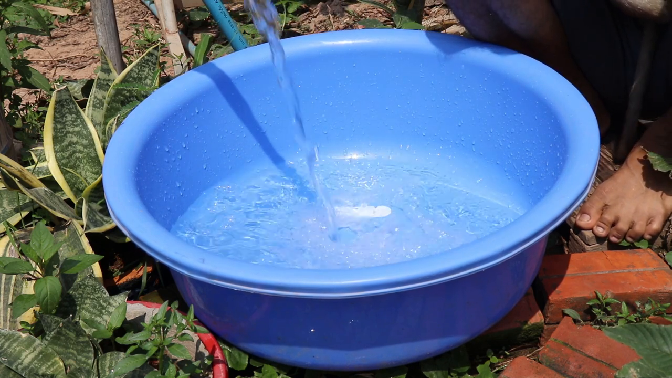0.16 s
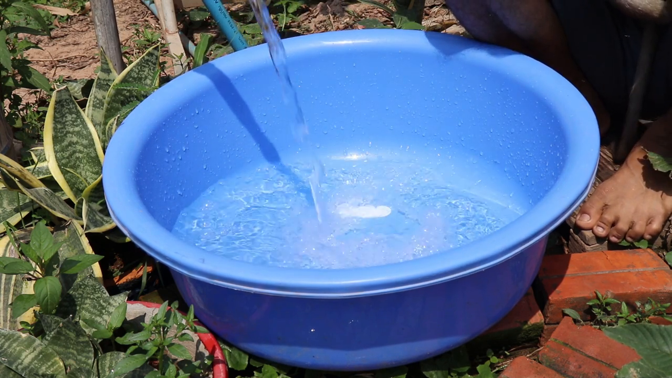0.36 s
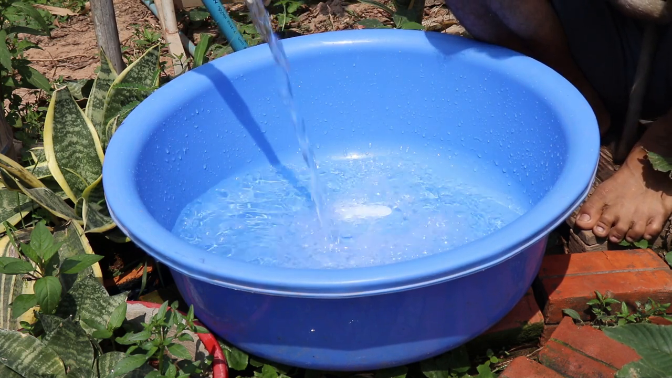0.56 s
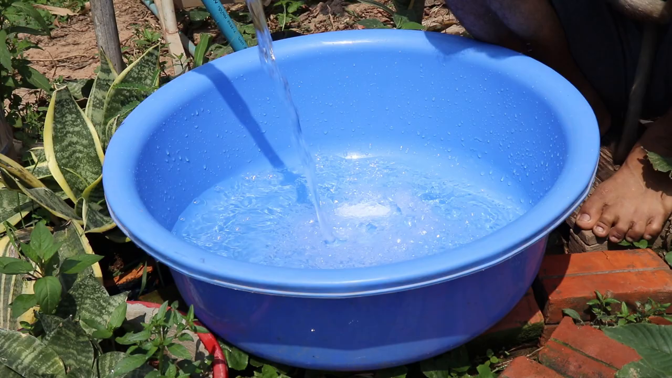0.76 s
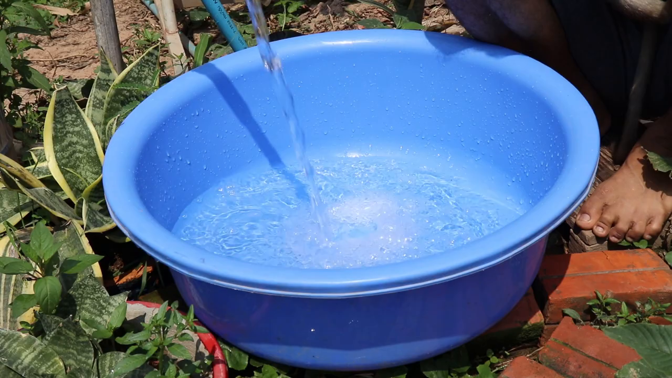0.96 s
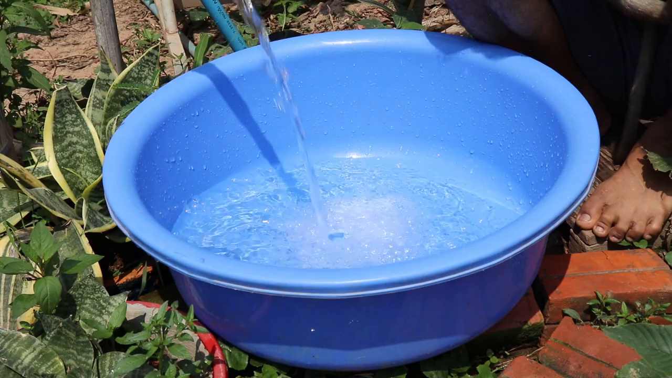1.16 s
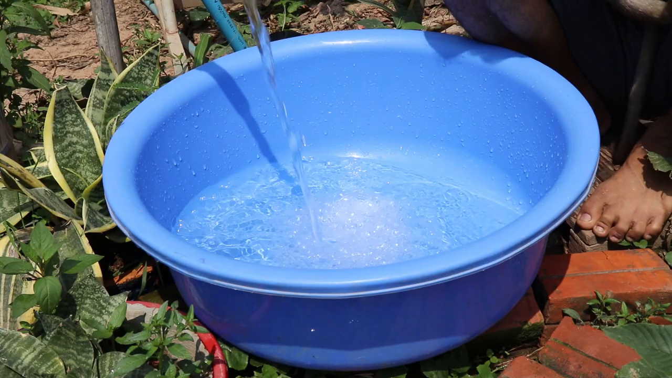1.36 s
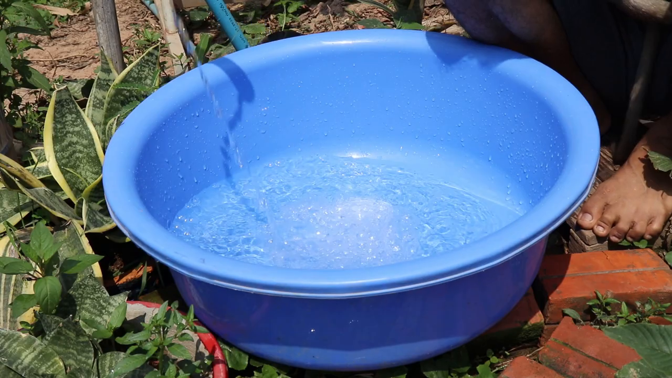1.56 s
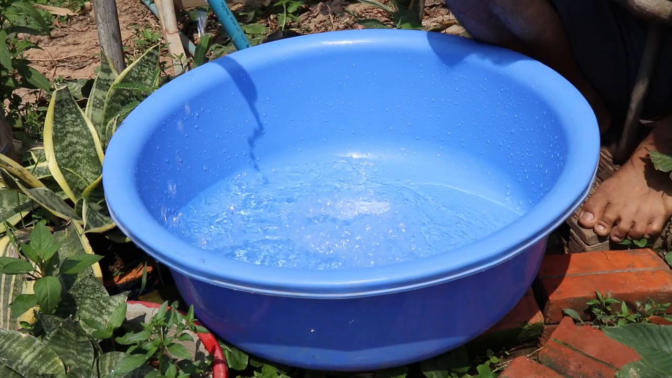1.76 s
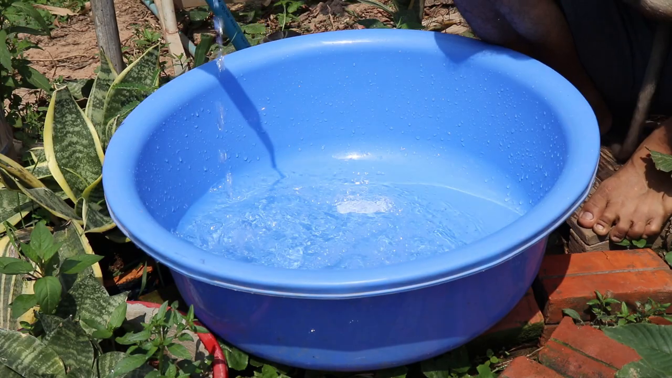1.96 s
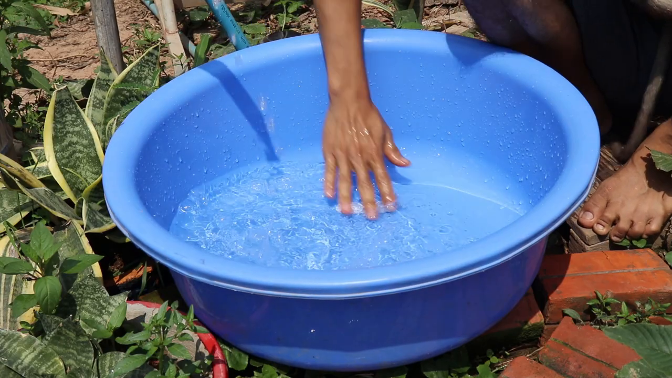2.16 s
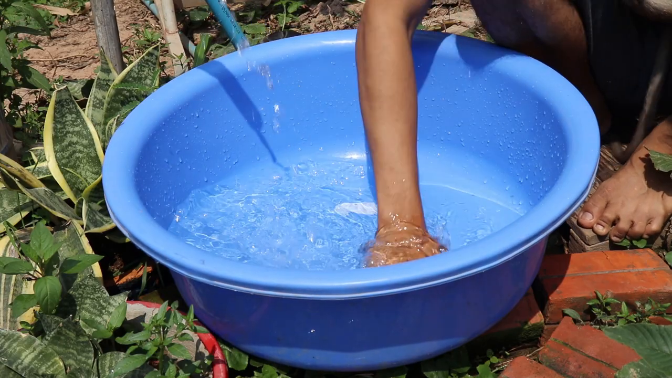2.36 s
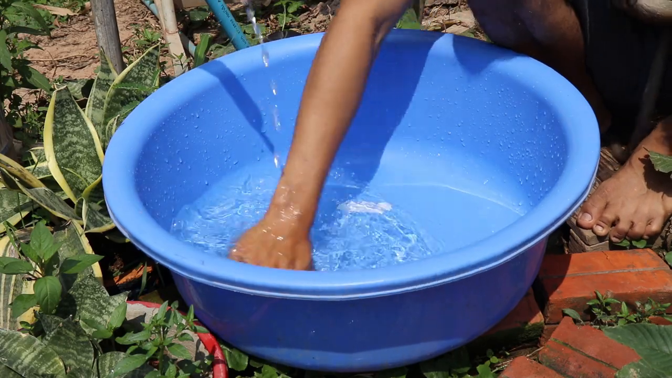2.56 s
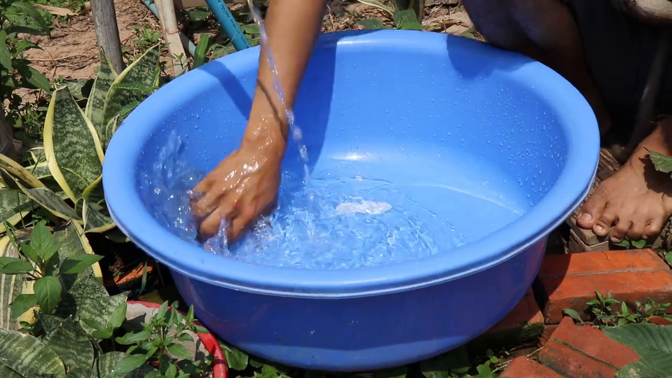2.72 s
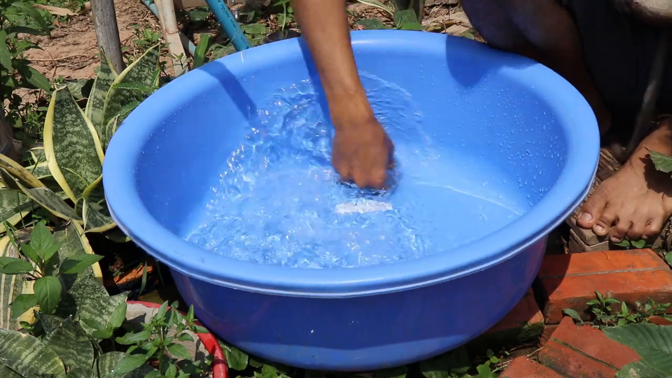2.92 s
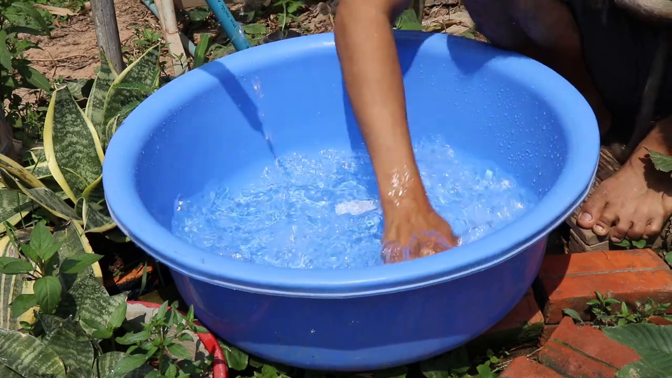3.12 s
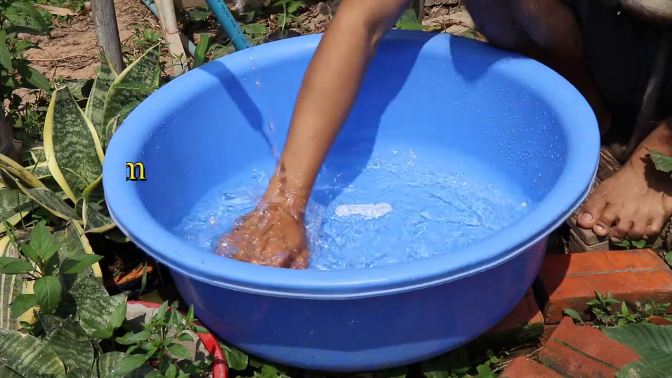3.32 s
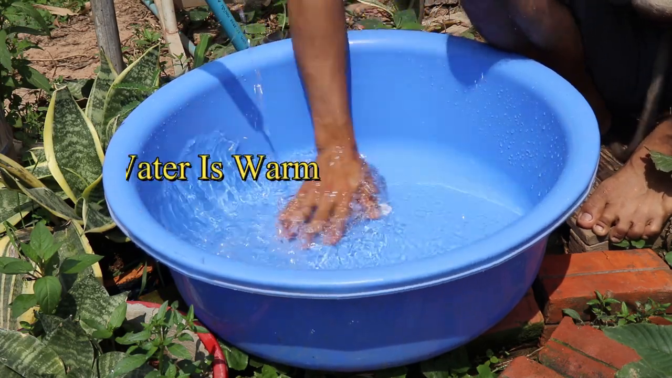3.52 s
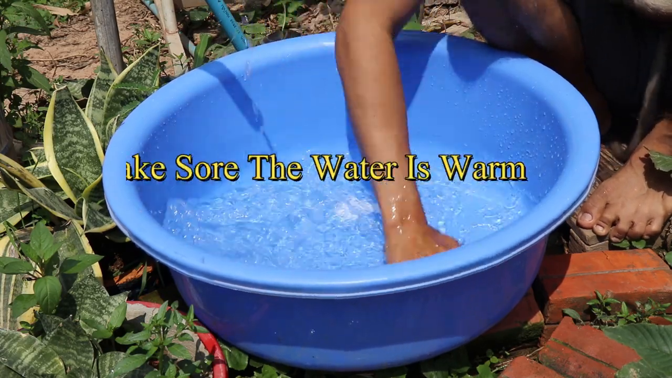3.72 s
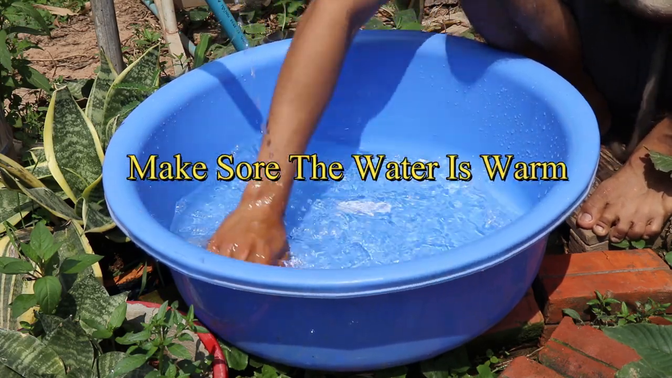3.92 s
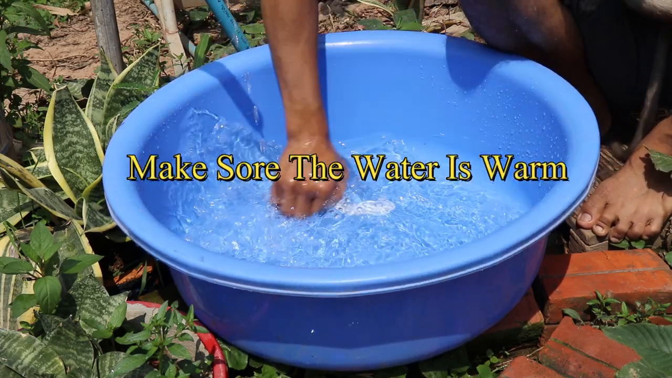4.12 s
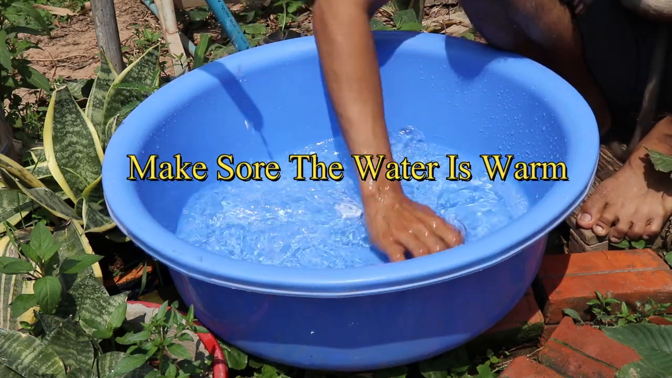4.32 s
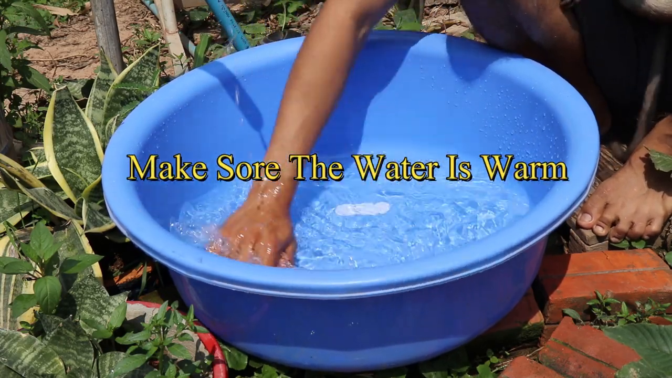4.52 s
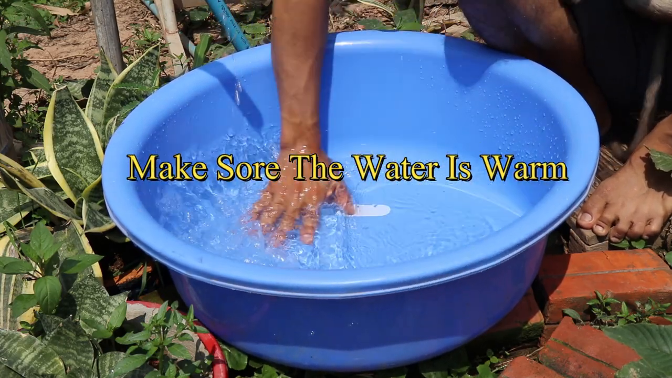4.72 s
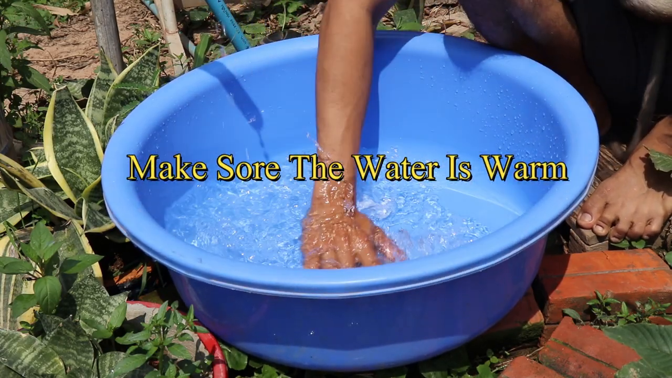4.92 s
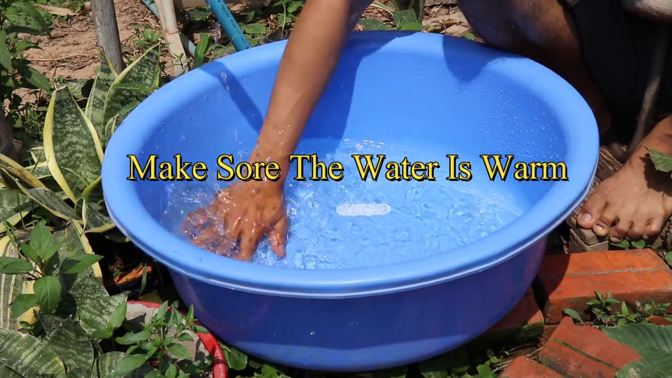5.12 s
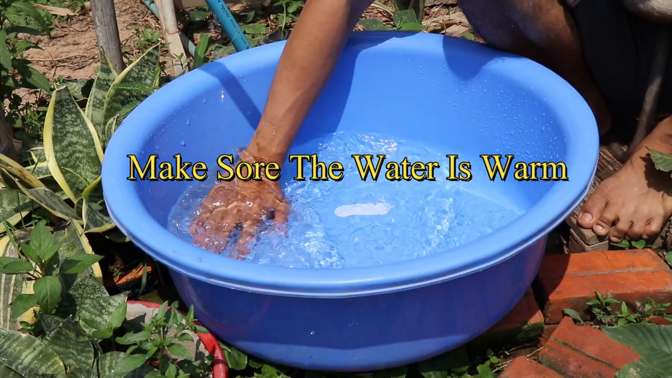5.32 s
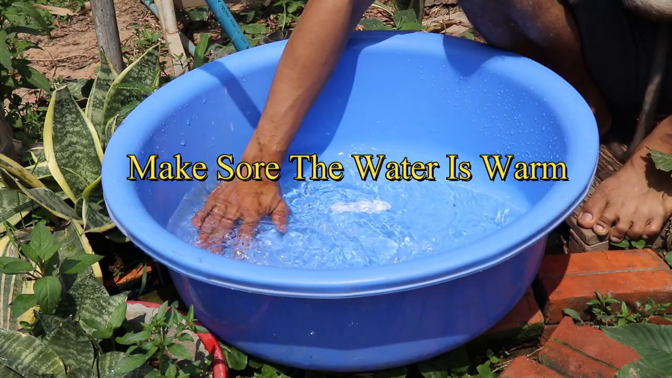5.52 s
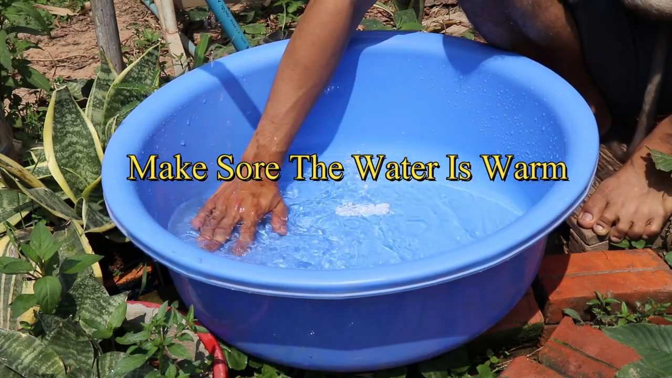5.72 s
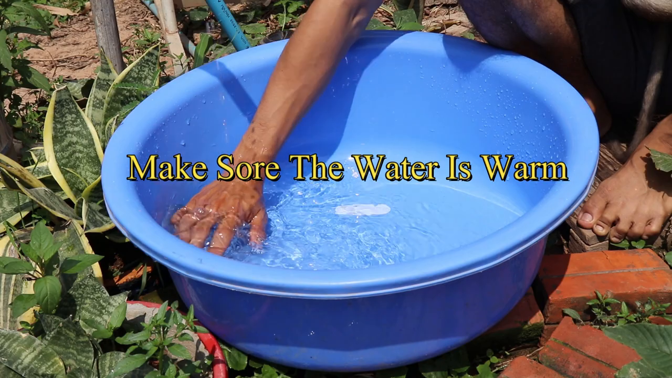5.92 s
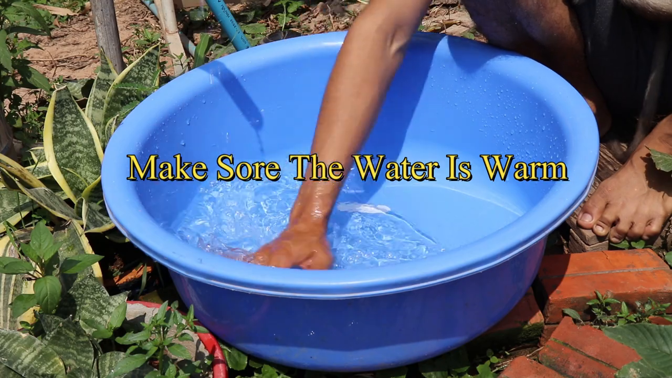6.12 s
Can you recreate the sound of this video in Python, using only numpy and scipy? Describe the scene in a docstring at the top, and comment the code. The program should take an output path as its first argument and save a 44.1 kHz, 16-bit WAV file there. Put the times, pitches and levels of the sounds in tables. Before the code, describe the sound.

Close outdoor sound of water falling hard into a half-full plastic basin, dense and bubbly with hollow gurgles and bright hissing spray. After under two seconds it breaks up into sparse drips and plinks. Then a hand swishes the water to and fro in lively, uneven splashes, which settle to faint trickling before one last small stir. Dry, close, single-channel, with very faint open air.

```python
"""Outdoors, a half-full plastic basin: water falls in from above, thins to drops, and a hand swishes it to and fro.
The body of the sound is trapped air: swarms of decaying sine bubbles whose pitch climbs as they ring.
Filtered noise bursts give the slaps and ticks of falling drops, and tiny clicks the patter of spray.
Wall echoes and hollow resonances colour the water, over faint shaped-noise air and a wavering low hum."""
import sys
import numpy as np
from scipy import signal
from scipy.fft import rfft, irfft, next_fast_len
from scipy.io import wavfile
from scipy.ndimage import uniform_filter1d

SR = 44100
rng = np.random.default_rng(int(sys.argv[2]) if len(sys.argv) > 2 else 0)


def int16_out(signal):
    """Quantize to a 16-bit WAV file."""
    q = np.round(np.clip(np.atleast_2d(signal).T, -1, 1) * 32767)
    wavfile.write(sys.argv[1], SR, q.astype(np.int16))


N = 272097

# Lumps and thin spots in the falling stream: [t/s, swell of the babble level/dB]
GLUGS = [(0.03, 0.5), (0.11, 0.5), (0.2, 2.5), (0.3, -0.5), (0.36, 1), (0.435, 2), (0.595, -1.5), (0.65, 1),
         (0.709, 2.5), (0.78, 2), (1.01, 3), (1.105, 3), (1.18, 2), (1.23, -0.5), (1.285, 2), (1.431, 3),
         (1.635, 2)]
# How hard the water is stirred and how much is thrown: [t/s, bubble level/dB, spray level/dB]
STIR = [(1.8, -45.5, -44), (2.03, -45, -49), (2.25, -41.5, -38), (2.46, -42, -36.5), (2.7, -36.5, -38),
        (2.8, -29, -34), (3.12, -28, -32.5), (3.45, -33.5, -34), (3.6, -28.5, -33.5), (4.15, -29.5, -36.5),
        (4.3, -35, -38), (4.8, -33, -38.5), (4.98, -30.5, -36), (5.15, -31, -36.5), (5.33, -43.5, -46),
        (5.6, -44.5, -47.5), (5.98, -48.5, -48), (6.17, -35.5, -40)]
# The hand or a late lump of water breaks the surface:
# [t/s, hold/s, bubble level/dB, gurgle level/dB, spray level/dB]
SPLASHES = [(1.957, .012, -39, -39, -48), (2.011, 0.017, -39.5, -39, -52), (2.058, .012, -28, -30.5, -33),
            (2.179, 0.0092, -32.5, -34, -36), (2.322, .03, -38, -39, -40), (2.35, .035, -32.5, -32, -42),
            (2.508, 0.019, -39.5, -46, -35), (2.624, 0.032, -39, -59, -48),
            (2.829, 0.099, -25.5, -33.5, -31), (3.078, 0.018, -30.5, -48, -44),
            (3.249, 0.093, -27.5, -35.5, -36), (3.321, 0.049, -35.5, -49, -31.5),
            (3.542, 0.035, -38, -38.5, -45), (3.759, 0.017, -30.5, -40, -35), (3.86, 0.051, -39, -38, -42),
            (4.067, 0.065, -34, -45, -35), (4.283, .025, -47, -36.5, -36), (4.37, .03, -37, -55, -53),
            (4.449, .02, -39, -54, -34), (4.54, 0.054, -44, -45, -34.5), (4.623, 0.038, -26.5, -34, -47),
            (4.765, 0.018, -48, -39, -46), (4.976, 0.07, -36, -48, -33.5), (5.107, 0.033, -35, -45, -50),
            (5.267, .015, -35.5, -52, -52), (5.489, .008, -35, -52, -49), (6.022, .035, -39, -40, -47),
            (6.148, .025, -30.5, -51, -42)]
# Spectrum of the large bubbles that the stream drives down: [f/Hz, relative level per hertz/dB]
DEEP_SPECTRUM = [(90, -23), (150, -13.5), (200, -11), (255, -5), (320, -2.5), (400, -3), (520, -3),
                 (750, -6.5), (1200, -38)]
# Spectrum of the gurgle from stirring and splashes: [f/Hz, relative level per hertz/dB]
GURGLE_SPECTRUM = [(90, -28), (150, -21), (200, -10.5), (260, -8), (320, -2.5), (400, -1.5), (560, 0.5),
                   (750, -4), (1200, -52)]
# Spectrum of the smaller, higher bubbles: [f/Hz, relative level per hertz/dB]
BABBLE_SPECTRUM = [(350, -37), (550, -13.5), (750, -3.5), (1200, -2.5), (2200, -3), (2750, -8), (3500, -12),
                   (6000, -57.5)]
# Spectrum of fine spray, patter and drop ticks: [f/Hz, relative level per hertz/dB]
SPRAY_SPECTRUM = [(1800, -36), (2700, -6), (3200, -1), (3800, -2.5), (5300, -2), (6900, -5), (8000, -1.5),
                  (8900, -0.5), (10000, -8), (11400, -15), (14100, -12.5), (16000, -20)]
# Single bubbles that stand out, low plops to high plinks:
# [t/s, starting pitch f/Hz, relative level/dB, t60/s]
BUBBLES = [(0.088, 4840, -11, .012), (0.344, 1850, 9, 0.0061), (0.482, 1670, 0.5, 0.0078),
           (0.783, 710, -6, 0.034), (0.855, 1680, -2, 0.012), (1.012, 1300, -1, .014),
           (1.415, 1250, 5.5, 0.01), (1.79, 2850, -7.5, 0.0096), (1.96, 1350, -13, 0.018),
           (2.019, 665, -10, 0.012), (2.062, 930, -6.5, 0.025), (2.062, 4380, -3.5, .013),
           (2.075, 3220, -4, .008), (2.094, 1570, -10, 0.021), (2.121, 3020, -0.5, 0.0065),
           (2.16, 2450, -7, 0.018), (2.186, 1000, -5, 0.011), (2.185, 1790, 0, 0.0077),
           (2.23, 2860, -9, .011), (2.242, 4260, -10.5, .014), (2.245, 2200, -14, .02),
           (2.298, 2450, -13, 0.015), (2.327, 5900, -10.5, .01), (2.35, 1510, -10.5, 0.026),
           (2.394, 2820, -11, .012), (2.424, 3680, -19, .017), (2.478, 1690, -19, .022),
           (2.515, 1900, -8.5, .014), (2.536, 4820, -13, .01), (2.55, 2580, -16.5, .022),
           (2.632, 2220, -0.5, 0.0054), (2.633, 4380, -17, .022), (2.661, 1990, -6, 0.016),
           (2.687, 4520, -6.5, 0.0088), (2.704, 1800, -7, 0.011), (2.756, 1350, -5, .011),
           (2.776, 840, -9, 0.013), (2.832, 3050, -5.5, 0.009), (2.87, 850, -0.5, 0.012),
           (2.88, 1090, -3, .021), (2.922, 1960, 0.5, 0.013), (3.079, 1040, -4, 0.028),
           (3.163, 3920, -10.5, 0.041), (3.27, 684, -3.5, 0.012), (3.405, 2780, -7, .013),
           (3.488, 2110, -14.5, .04), (3.561, 2040, -4.5, 0.019), (3.646, 1560, -9, 0.028),
           (3.779, 3280, -7.5, 0.0088), (3.817, 3370, 0, 0.0058), (3.892, 736, -1.5, 0.0097),
           (4.046, 1104, -12.5, .05), (4.072, 854, -4, 0.01), (4.327, 1240, -9.5, 0.019),
           (4.359, 1440, -0.5, 0.008), (4.386, 1410, -6.5, 0.024), (4.442, 1163, -6, 0.041),
           (4.52, 1315, -2.5, .028), (4.6, 3350, -13, 0.0092), (4.63, 950, -3, .009),
           (4.669, 776, 0.5, 0.011), (4.674, 1350, 0, 0.01), (4.725, 846, -10, .012),
           (4.834, 1080, -2.5, .013), (4.98, 2090, -.5, 0.0075), (5.137, 1200, 2, .008),
           (5.28, 795, -13.5, .018), (5.494, 965, -9.5, 0.015), (5.498, 1650, -12.5, .022),
           (5.558, 2400, -13.5, 0.012), (5.601, 1750, -8, 0.0074), (5.657, 1800, -4.5, 0.0067),
           (5.745, 1660, -22, .02), (5.822, 850, -15, 0.011), (5.875, 3890, -9.5, 0.0076),
           (6.019, 1160, -9.5, .01), (6.039, 1100, -4, 0.01), (6.051, 580, -10.5, 0.016),
           (6.12, 2850, -18.5, .02), (6.135, 2220, -15, 0.022), (6.153, 1510, -8, .012)]
# Drops and lumps hitting the surface:
# [t/s, relative tick level/dB, centre of the tick f/Hz, relative slap-to-tick level/dB]
SPLATS = [(0.0887, -4.5, 4960, -16), (0.202, -5, 3260, -1), (0.3144, -4, 9150, -18), (0.383, -5, 8300, -16),
          (0.4212, -4, 3300, -16), (0.6646, -5.5, 3280, 1), (0.6984, -2, 5360, -15),
          (0.8546, -9, 3000, -10), (1.0077, -5, 8550, -17), (1.105, -4.5, 8370, -22),
          (1.264, -1, 6420, -20), (1.294, -6, 5370, -24), (1.3838, -4.5, 9200, -24),
          (1.461, -3.5, 8100, -14), (1.6128, -3.5, 5670, -13), (1.6557, -3, 6100, -22),
          (1.755, -17, 3760, -22), (1.7726, -11, 3330, -24), (1.8993, -13, 5900, -27),
          (1.983, -18.5, 3410, -12), (2.034, -25, 4320, 1), (2.062, -7, 4740, -8), (2.1036, -14, 8480, -15),
          (2.1204, -6.5, 5930, -2), (2.1582, -17, 3190, -6), (2.185, -9, 9550, 0.5),
          (2.2085, -13, 6270, -19), (2.256, -7.5, 9080, -29), (2.2998, -12, 8160, -20),
          (2.332, -9, 8900, -11), (2.363, -12, 3350, -8), (2.3923, -17, 3020, -10),
          (2.4498, -14, 6180, -10), (2.4877, -15, 8200, -16), (2.5702, -6.5, 7660, -29),
          (2.659, -14, 8600, -0.5), (2.6868, -17, 4750, -17), (2.729, -11.5, 9010, -22),
          (2.77, -7.5, 4200, -9), (2.9523, -15, 8830, -7), (3.022, -7.5, 5480, -11),
          (3.0745, -7.5, 4450, -11), (3.1649, -8.5, 3980, -10), (3.371, -12, 5000, -3),
          (3.5604, -13.5, 3030, 7), (3.6275, -8.5, 3970, -8), (3.8693, -13, 8130, -1),
          (3.9676, -6.5, 5800, -20), (3.9758, -6, 8550, -20), (4.5137, -10.5, 4840, -15),
          (4.63, -14, 3200, -4), (4.7072, -10.5, 8000, -22), (4.777, -10, 9170, -3), (4.8794, -7, 7300, -9),
          (4.9346, -11, 8080, -19), (4.979, -9, 8050, -16), (4.987, -4, 7100, -26), (5.018, -10, 4140, -1),
          (5.117, -7, 3900, -3.5), (5.2166, -17.5, 3150, 4), (5.397, -18.5, 5000, -20),
          (5.441, -21, 5900, -19), (5.5192, -19, 4500, -20), (5.541, -16, 9400, -22), (5.6, -22, 3030, 3),
          (5.6563, -15, 6700, -19), (5.6822, -14.5, 8800, -24), (5.737, -16.5, 8700, -27),
          (5.82, -23.5, 3780, 0), (5.8747, -18.5, 3600, -22), (5.9329, -9.5, 7400, -28),
          (6.067, -14, 2840, -18), (6.1538, -18, 2960, 7.5)]
# Spectrum of the duller slap under a tick: [f/Hz, relative level per hertz/dB]
SLAP_SPECTRUM = [(100, -24), (300, -7), (900, -33), (2200, 6), (3500, 3), (7000, -33)]
# Resonant modes of the basin's hollow: [f/Hz, width/Hz, level/dB]
HOLLOW_MODES = [(314.5, 53, 1.5), (817, 80, -7.5), (1420, 23, -9), (2000, 120, -23)]
# Spectrum of still outdoor air: [f/Hz, relative level per hertz/dB]
AIR_SPECTRUM = [(20, -7), (40, -4), (55, 4), (72, -8), (135, 4.5), (180, -1.5), (300, 1), (550, -8),
                (850, -5), (1400, -7.5), (3000, -23.5), (9000, -28), (16000, -20)]
# Course of the distant hum: [t/s, relative level/dB]
HUM_COURSE = [(0, -47), (0.4, -40), (0.52, -40), (0.62, -58), (1.9, -53.5), (2.45, -49.5), (3.9, -52),
              (4.2, -57), (6.17, -62)]
# Spectrum of the rumble around the hum: [f/Hz, relative level per hertz/dB]
RUMBLE_SPECTRUM = [(60, -25), (85, -4), (110, 5), (150, -1), (220, -44)]

# the steady pour: when it breaks up, how fast it then dies, and its base levels
POUR_END_S, POUR_FALL_DB_PER_S = 1.699, 190
POUR_DEEP_DB, POUR_BABBLE_DB, POUR_SPRAY_DB = -32.5, -26, -28
POUR_DULLING_DB_PER_S = 1  # its spray fades as the water deepens
# the dribble of spray that outlasts the pour, fading from the break-up on
DRIBBLE_DB, DRIBBLE_FADE_DB_PER_S = -39, 8
# time for a glug to fall to 1/e either side; its swell in deep bubbles and spray as multiples of the babble's
GLUG_WIDTH_S, GLUG_DEEP, GLUG_SPRAY = 0.02, 2.27, 0.41
STIR_GURGLE_DB = -14  # relative to the stirred bubbles
SPLASH_ATTACK_S, SPLASH_FALL_DB_PER_S = .005, 330
SPRAY_LAG_S = 0.041  # thrown water lands a little later
# full bubble rate from this babble level up; below it the rate falls tenfold over the thinning range
FULL_CHURN_DB, THINNING_DB = -25, 19
BUBBLE_RISE = .1  # share by which a single bubble's pitch climbs over one t60
TOP_HZ = 15950  # half-gain point of the final low-pass


def amp(db):
    """Decibels to gain."""
    return 10 ** (np.asarray(db) / 20)


def unit(x):
    """Scale x to rms 1."""
    return x / np.sqrt(np.mean(x ** 2) + 1e-20)


def along(points, hz):
    """Read (frequency, value) points on a log frequency axis."""
    f, v = np.transpose(points)
    return np.interp(np.log(hz + 1), np.log(f + 1), v)


def curves(rows):
    """Draw one curve, a value per sample, for each column after the time."""
    s, *cols = np.transpose(rows)
    return [np.interp(np.arange(N) / SR, s, c) for c in cols]


def add(track, s, sound):
    """Mix a sound into the track at s seconds."""
    part = track[max(round(s * SR), 0):][:len(sound)]
    part += sound[:len(part)]


def filtered(x, response):
    """Multiply the spectrum of x by a complex response of frequency."""
    size = next_fast_len(len(x) + 8192)
    spectrum = rfft(x, size) * response(np.fft.rfftfreq(size, 1 / SR))
    return irfft(spectrum, size)[:len(x)]


def coloured(x, level_db, size=2048):
    """Shape x with a minimum-phase filter, so that a click keeps its sharp front."""
    gain = amp(level_db(np.fft.rfftfreq(size, 1 / SR)))
    cepstrum = irfft(np.log(gain + 1e-6))
    # folding the cepstrum makes the filter causal
    cepstrum[1:size // 2] *= 2
    cepstrum[size // 2 + 1:] = 0
    impulse = irfft(np.exp(rfft(cepstrum)))
    return signal.fftconvolve(x, impulse)[:len(x)]


def noise(spectrum):
    """Steady noise of the given spectrum at rms 1."""
    return unit(filtered(rng.standard_normal(N), lambda hz: amp(along(spectrum, hz))))


def heavy_tail(draw, spread_db):
    """Turn uniform draws into very uneven gains, exponential in decibels with a cap."""
    return amp(spread_db * np.minimum(-np.log(1 - draw), 3))


def pour(lag=0):
    """Gain of the falling stream: steady until it breaks up, then a fast fall."""
    t = np.arange(N) / SR
    return amp(-POUR_FALL_DB_PER_S * np.maximum(t - POUR_END_S - lag, 0))


def splash(s, hold):
    """Gain of one splash: a quick rise, a hold and a fall in decibels."""
    age = np.arange(N) / SR - s
    rise = np.clip(age / SPLASH_ATTACK_S, 0, 1)
    return rise * amp(-SPLASH_FALL_DB_PER_S * np.clip(age - hold, 0, 1))


def flow():
    """Gains of deep bubbles, gurgle, babble and spray: pour, stirring and splashes add in power."""
    t = np.arange(N) / SR
    glug_db = sum(db * np.exp(-np.minimum(((t - s) / GLUG_WIDTH_S) ** 2, 20)) for s, db in GLUGS)
    stir, thrown = amp(curves(STIR))

    deep = pour() * amp(POUR_DEEP_DB + GLUG_DEEP * glug_db)
    # the other three are powers until the end
    gurgle = (stir * amp(STIR_GURGLE_DB)) ** 2
    babble = stir ** 2 + (pour() * amp(POUR_BABBLE_DB + glug_db)) ** 2
    pour_spray_db = POUR_SPRAY_DB - POUR_DULLING_DB_PER_S * t + GLUG_SPRAY * glug_db
    dribble_db = DRIBBLE_DB - DRIBBLE_FADE_DB_PER_S * np.maximum(t - POUR_END_S, 0)
    spray = thrown ** 2 + (pour(SPRAY_LAG_S) * amp(pour_spray_db)) ** 2 + amp(dribble_db) ** 2

    for s, hold, bubble_db, gurgle_db, spray_db in SPLASHES:
        shape = splash(s, hold)
        gurgle += (amp(gurgle_db) * shape) ** 2
        babble += (amp(bubble_db) * shape) ** 2
        add(spray, SPRAY_LAG_S, (amp(spray_db) * shape) ** 2)
    return deep, np.sqrt(gurgle), np.sqrt(babble), np.sqrt(spray)


def ring(t, hz, t60, rise):
    """A bubble: it swells within a cycle, dies away and climbs in pitch as it nears the surface."""
    t, hz, t60 = np.float32(t), np.float32(hz), np.float32(t60)
    age, turns = t / t60, t * hz
    fade = np.exp(np.float32(-np.log(1000)) * np.minimum(age, 10))
    swell = 1 - np.exp(-np.minimum(turns, 20))
    # halved in the phase, the rise is the full climb in pitch over one t60
    return fade * swell * np.sin(2 * np.pi * turns * (1 + np.float32(rise / 2) * age))


def surges(rate, t60, spread_db, swell=0.0043):
    """Water arrives in lumps: each stirs the surface within milliseconds (swell in s), then fades."""
    jitter, weight = rng.random((int(rate * N / SR), 2)).T
    at = ((np.arange(len(jitter)) + 2 * jitter) * SR / rate).astype(int)
    blows = np.bincount(at, amp(spread_db * weight), N)[:N]
    t = np.arange(SR // 10) / SR
    stirred = amp(-60 * t / t60) * (1 - np.exp(-t / swell))
    return unit(signal.fftconvolve(blows, stirred)[:N].clip(0))


def swarm(spectrum, busy, surge, low_hz, high_hz, rate, cycles, spread_db, rise, wash_db, count):
    """Many small bubbles, born at random where the surface is busy; the finest merge into a noise wash."""
    when, size, pitch, life, chance = rng.random((count, 5)).T
    at = (when * N).astype(int)
    # rate is births per second on a fully busy surface
    born = chance < busy[at] * rate * N / SR / count
    at, size, pitch, life = at[born], size[born], pitch[born], life[born]

    hz = (low_hz * (high_hz / low_hz) ** pitch)[:, None]
    # t60 runs from half to twice the given number of cycles
    t60 = cycles * 2 ** (2 * life[:, None] - 1) / hz
    t = np.arange(int(min(cycles / low_hz, .06) * SR)) / SR
    strength = heavy_tail(size, spread_db) * surge[at]
    # small bubbles are short but sharp, so that each hertz gets the same energy
    grains = strength[:, None] * hz * ring(t, hz, t60, rise)
    places = at[:, None] + np.arange(len(t))
    ringing = np.bincount(places.ravel(), grains.ravel(), N)[:N]
    ringing = unit(coloured(ringing, lambda f: along(spectrum, f)))

    wash = unit(np.sqrt(busy) * surge * noise(spectrum))
    mix = ringing + amp(wash_db) * wash
    # the flow, not chance, sets the slow level: even it out to a local rms near 1
    power = uniform_filter1d(uniform_filter1d(mix ** 2, size=2400), size=2400)
    return mix / np.sqrt(np.abs(power) + 1e-6)


def patter(busy, surge, rate, spread_db, count=4000):
    """Flying droplets fall back on the surface as tiny clicks of very uneven size; rms 1."""
    when, size, chance = rng.random((count, 3)).T
    at = (when * N).astype(int)
    falls = chance < np.sqrt(busy[at]) * rate * N / SR / count
    clicks = np.bincount(at, falls * surge[at] * heavy_tail(size, spread_db), N)
    return unit(coloured(clicks, lambda f: along(SPRAY_SPECTRUM, f)))


def churn(gains, steady=1.0, own=0.35, patter_db=-7.5):
    """Stream and hand fold air into the water: gurgles, bubbles and spray, partly surging together."""
    deep_gain, gurgle_gain, babble_gain, spray_gain = gains
    busy = np.minimum(babble_gain / amp(FULL_CHURN_DB), 1) ** (20 / THINNING_DB)
    shared = surges(rate=85, t60=0.024, spread_db=6.5) + steady

    def surge():
        """The shared surging plus a share of each family's own."""
        return unit(shared + own * surges(rate=130, t60=0.014, spread_db=19))

    # the stream traps larger, deeper bubbles than the hand does
    deep = swarm(DEEP_SPECTRUM, busy, surge(), 179.6, 757, rate=450, cycles=12.0,
                 spread_db=-1.5, rise=0.099, wash_db=-1, count=4000)
    gurgle = swarm(GURGLE_SPECTRUM, busy, surge() ** 0.9, 278, 810, rate=700, cycles=7.9,
                   spread_db=2.5, rise=.1, wash_db=4, count=5000)
    # smaller bubbles ring higher, up to the fizz and patter of the spray
    babble = swarm(BABBLE_SPECTRUM, busy, surge() ** 0.7, 540.0, 3427, rate=1300, cycles=16.0,
                   spread_db=3.6, rise=0.24, wash_db=-3.0, count=10000)
    fizz = swarm(SPRAY_SPECTRUM, busy, surge(), 2697, 15870, rate=2200, cycles=36,
                 spread_db=4, rise=0.053, wash_db=-4.0, count=16000)
    spray = fizz + amp(patter_db) * patter(busy, shared, rate=220, spread_db=7.0)
    return deep_gain * deep + gurgle_gain * gurgle + babble_gain * babble + spray_gain * spray


def bubbles():
    """Single bubbles of trapped air stand out from the rest, from low plops to high plinks."""
    track, t = np.zeros(N), np.arange(SR // 12) / SR
    for s, hz, db, t60 in BUBBLES:
        add(track, s, amp(db - 4.5) * ring(t, hz, t60, BUBBLE_RISE))
    return track


def plinks(spray_gain, low_hz=1700, high_hz=6500, t60=.018, level_db=5, spread_db=8, count=100):
    """Stray droplets each trap one small bright bubble, louder when more spray flies."""
    track, t = np.zeros(N), np.arange(SR // 25) / SR
    for k, (when, pitch, size) in enumerate(rng.random((count, 3))):
        at = int((k + when) * N / count)
        gain = spray_gain[at] * amp(level_db + spread_db * (size - .5))
        hz = low_hz * (high_hz / low_hz) ** pitch
        add(track, at / SR, gain * ring(t, hz, t60, BUBBLE_RISE))
    return track


def splat(t, t60, click, level_db):
    """One impact of peak 1: a sharp click, then a short burst of torn water."""
    burst = rng.standard_normal(len(t)) * amp(-60 * t / t60)
    burst[0] += click
    impact = coloured(burst, level_db)
    return impact / np.abs(impact).max()


def splats(tick_t60=.014, slap_t60=0.041, focus_db=11, focus_octaves=0.29):
    """Each falling drop hits the surface with a bright tick and a duller, longer slap."""
    track, t = np.zeros(N), np.arange(SR // 20) / SR
    for s, db, tick_hz, slap_db in SPLATS:
        def tick_level(f):
            """The spray spectrum with a bump at the tick's centre."""
            octaves = np.log2((f + 1) / tick_hz)
            return along(SPRAY_SPECTRUM, f) + focus_db * np.exp(-(octaves / focus_octaves) ** 2)

        tick = splat(t, tick_t60, 7.9, tick_level)
        slap = splat(t, slap_t60, 15, lambda f: along(SLAP_SPECTRUM, f))
        add(track, s, amp(db - 1.0) * (tick + amp(slap_db - 2.0) * slap))
    return track


def basin(x, walls_db=-9, t60=0.052, size=4096):
    """Walls throw back quick echoes, in a new pattern for each short block; the hollow rings at its modes."""
    echoes, t = np.zeros(N), np.arange(size) / SR
    for start in range(0, N, size):
        # the first millisecond stays free of echoes
        tail = rng.standard_normal(size) * amp(-60 * t / t60) * (t > .001)
        tail /= np.linalg.norm(tail)
        add(echoes, start / SR, signal.fftconvolve(x[start:start + size], tail))

    def hollow(f):
        """Direct sound plus one band-pass resonance per mode."""
        return 1 + sum(amp(db) * 1j * f * width / (centre * centre - f * f + 1j * f * width)
                       for centre, width, db in HOLLOW_MODES)

    return filtered(x + amp(walls_db) * echoes, hollow)


def outdoors(air_db=-47, hum_hz=97, waver_hz=4, rumble_share=0.45):
    """Faint open air as shaped noise, and a low hum far away whose pitch wanders a little."""
    wander = unit(filtered(rng.standard_normal(N), lambda f: np.exp(-(f / 12) ** 2)))
    tone = unit(np.sin(2 * np.pi * np.cumsum(hum_hz + waver_hz * wander) / SR))
    hum = tone + rumble_share * noise(RUMBLE_SPECTRUM)
    return amp(air_db) * noise(AIR_SPECTRUM) + amp(curves(HUM_COURSE)[0] - 0.5) * hum


def scene():
    """All the water sounds inside the basin, in the open air; one channel."""
    gains = flow()
    water = churn(gains) + bubbles() + plinks(gains[-1]) + splats()
    return (basin(water) + outdoors())[None]


def record(dry):
    """A very steep low-pass takes away everything above the top of the band."""
    return np.array([filtered(channel, lambda hz: 1 / (1 + (hz / TOP_HZ) ** 200)) for channel in dry])


dry = scene()
out = record(dry)
int16_out(out)
```